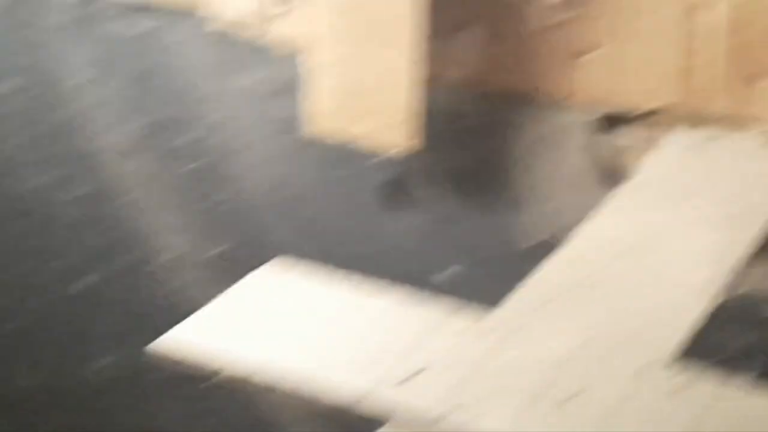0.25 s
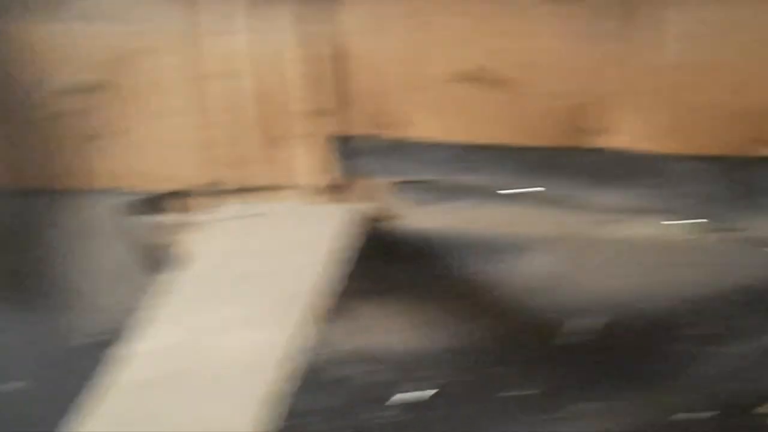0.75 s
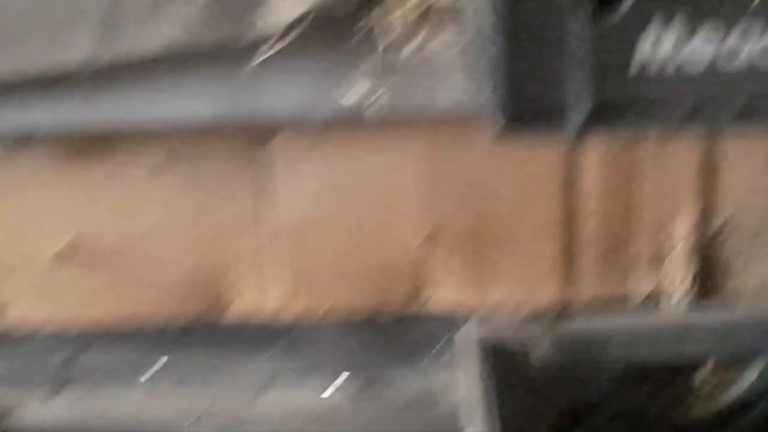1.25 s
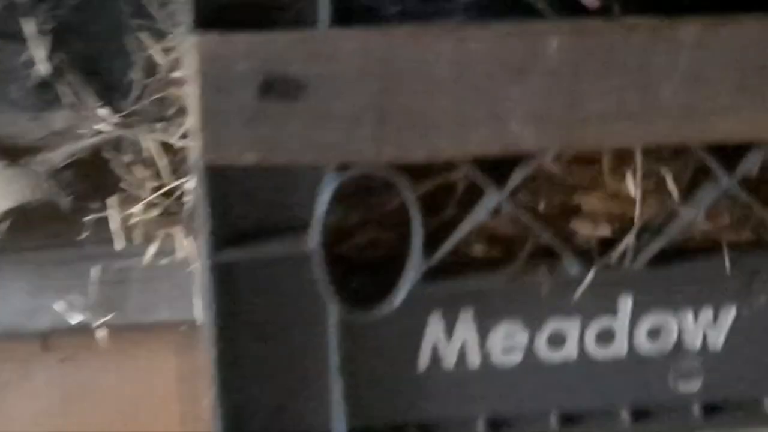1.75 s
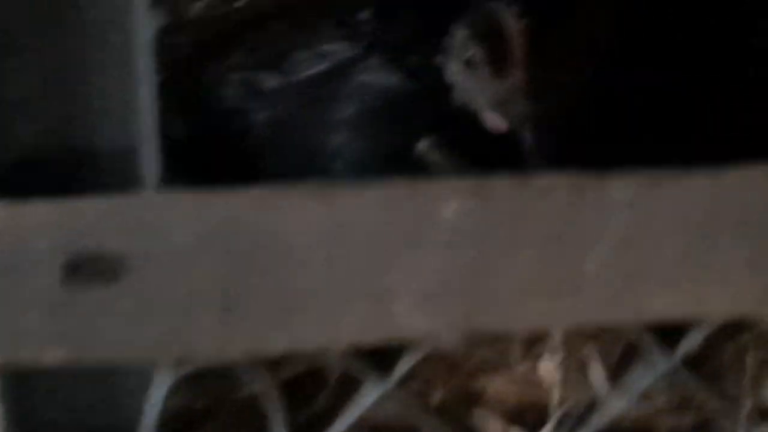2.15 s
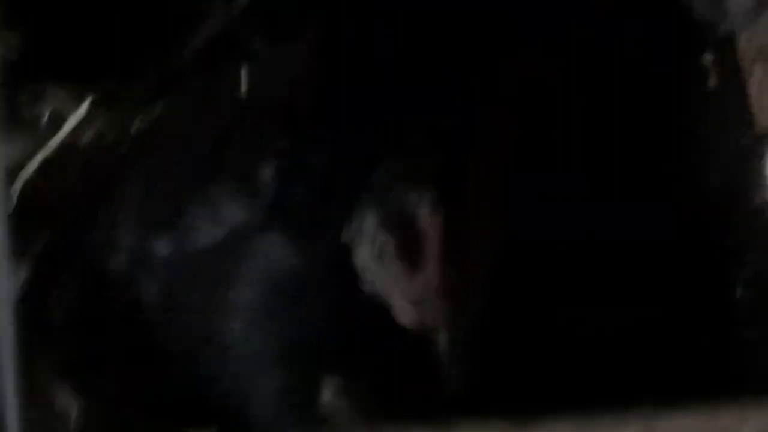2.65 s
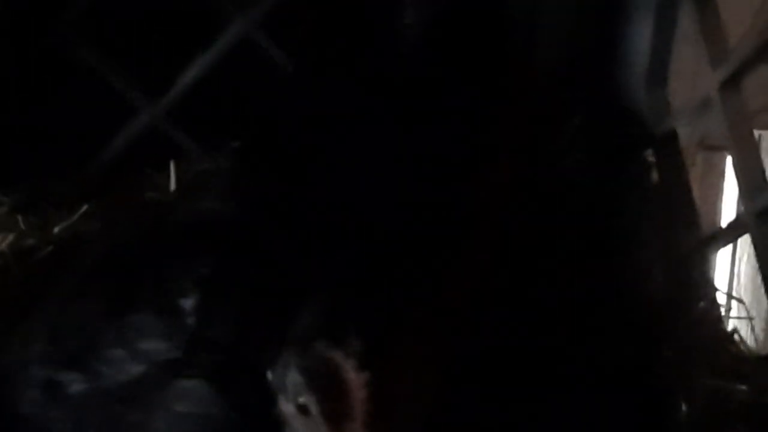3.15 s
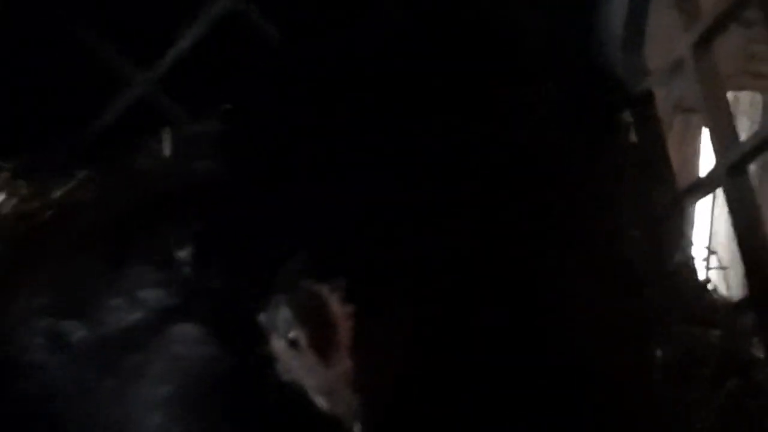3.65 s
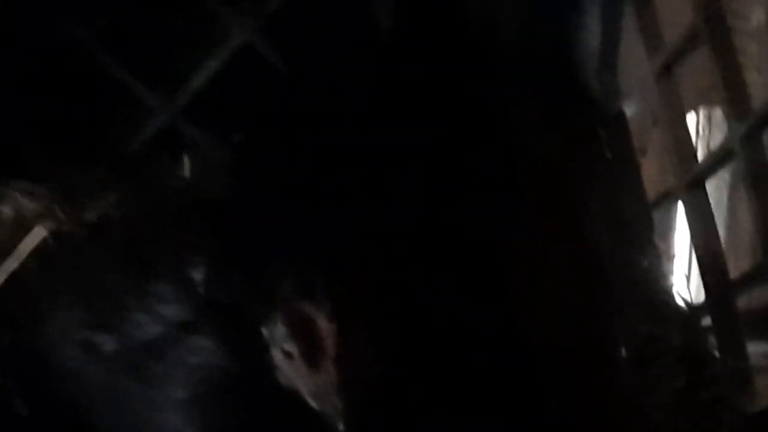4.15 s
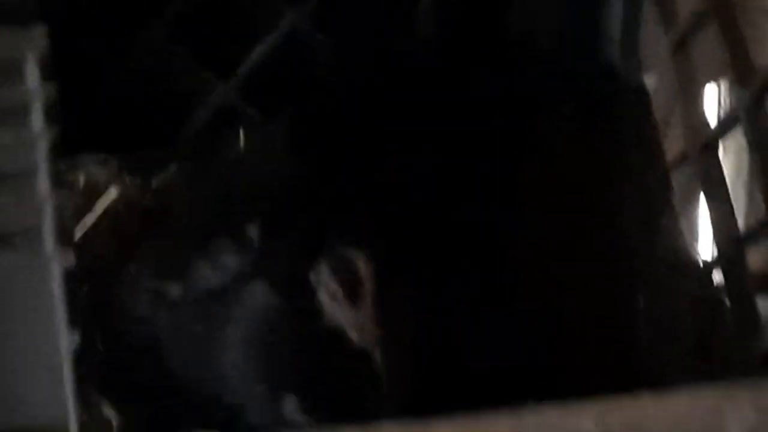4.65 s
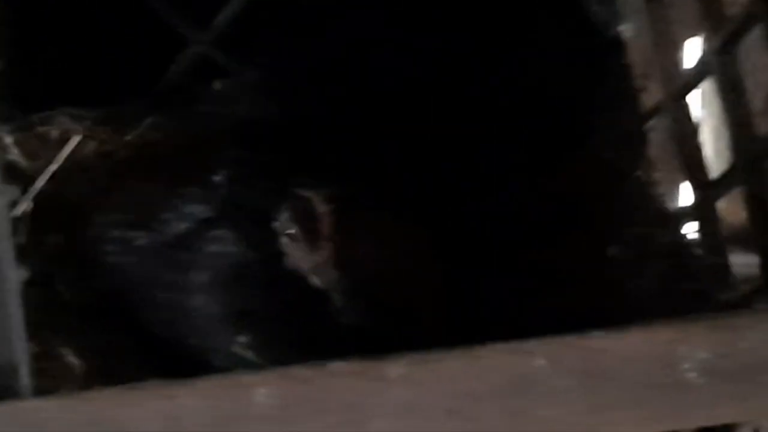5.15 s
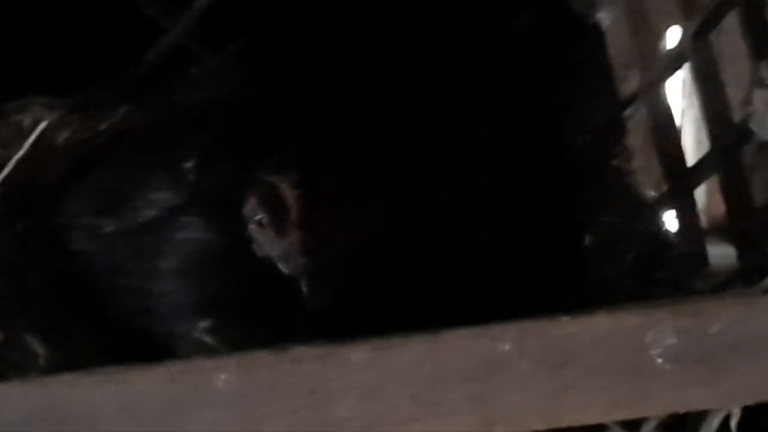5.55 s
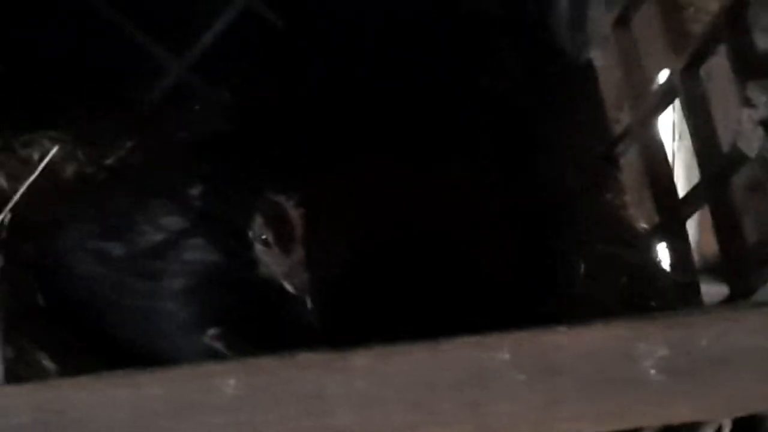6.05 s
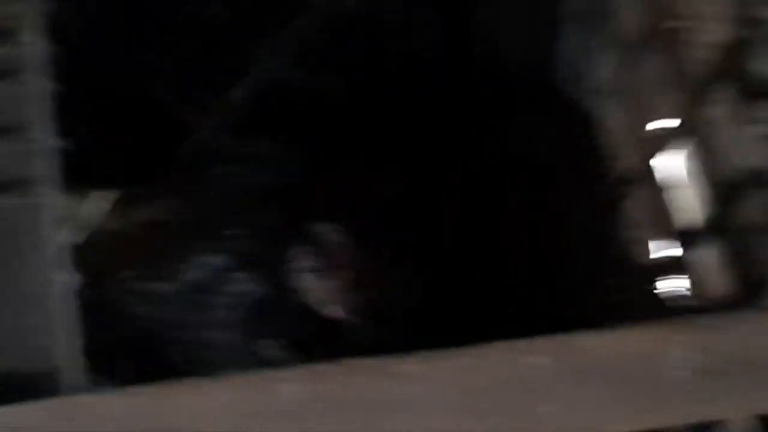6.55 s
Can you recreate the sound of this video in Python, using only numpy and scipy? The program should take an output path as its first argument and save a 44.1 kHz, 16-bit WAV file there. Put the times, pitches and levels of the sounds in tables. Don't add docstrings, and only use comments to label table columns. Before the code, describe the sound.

Handling bumps and a hen's rough squawk, then overlapping rooster crows with close clucks in a wooden coop, ending in clucks, growly moans and sharp handling ticks.

```python
import sys
import numpy as np
from scipy import signal
from scipy.fft import rfft, irfft
from scipy.io import wavfile
from scipy.ndimage import uniform_filter1d

SR = 44100
rng = np.random.default_rng(int(sys.argv[2]) if len(sys.argv) > 2 else 0)


def unload_audio(sound):
    columns = np.transpose(np.atleast_2d(sound))
    steps = np.round(np.clip(columns, -1, 1) * 32767)
    wavfile.write(sys.argv[1], SR, steps.astype(np.int16))


def nominal_scale(level):
    x = np.asarray(level, float) / 20
    return 10 ** x


N = 299880

# [f/Hz, left-right level/dB]
PORT_SHADING = [(60, 2.5), (150, 2), (380, 4.5), (950, 5), (2380, -5), (5980, -7), (15000, 11.5)]


def evened(x):
    return x / np.sqrt(np.mean(x ** 2) + 1e-20)


def read(points, hz):
    f, value = np.transpose(points)
    return np.interp(np.log(hz + 1), np.log(f + 1), value)


def unroll(rows):
    s, *columns = np.transpose(rows)
    t = np.arange(s[0], s[-1], 1 / SR)
    return s[0], [np.interp(t, s, c) for c in columns]


def add(mix, s, sound):
    part = mix[..., round(s * SR):][..., :sound.shape[-1]]
    part += sound[..., :part.shape[-1]]


def wobble(size, hz):
    settle = 4000
    drift = signal.lfilter(*signal.butter(2, hz, fs=SR), rng.standard_normal(size + settle))
    return evened(drift[settle:])


def resonate(x, hz, width, count=1):
    turn = np.exp(2j * np.pi * np.cumsum(hz * np.ones(len(x))) / SR)
    r = np.exp(-np.pi * width / SR)
    low = x / turn
    for _ in range(count):
        low = signal.lfilter([1 - r], [1, -r], low)
    return 2 * (turn * low).real


def swell(t, rise):
    return t / rise * np.exp(1 - t / rise)


def ports(x, lag_ms, wet_db):
    # [f/Hz, t60/s]
    wall_decay = [(200, 0.4), (800, 0.32), (2500, 0.39), (8000, 0.1)]
    taps = np.zeros((2, SR // 2))
    at = np.arange(100, SR // 2 - 20, 20) + rng.integers(0, 20, (2, (SR // 2 - 101) // 20))
    np.put_along_axis(taps, at, rng.choice([-1., 1.], at.shape), 1)
    hz, t, z = signal.stft(taps, SR, nperseg=256)
    decay = nominal_scale(-60 * t / read(wall_decay, hz)[:, None])
    tail = signal.istft(z * decay, SR, nperseg=256)[1]
    tail /= np.linalg.norm(tail[0])
    both = x + nominal_scale(wet_db) * signal.fftconvolve(x[None], tail, axes=1)[:, :N]

    hz = np.fft.rfftfreq(2 * N, 1 / SR)
    side = np.array([[.5], [-.5]])
    shading = nominal_scale(side * read(PORT_SHADING, hz))
    delay = np.exp(-2j * np.pi * hz * side * lag_ms / 1000)
    return irfft(rfft(both, 2 * N) * shading * delay)[:, :N]


def phrase(notes, throat, attack_s, release_s, sag_db, scoop, rough, strain, tires=0):
    edge_db = -19
    crow_start_s = 1.9
    calls = []
    for s, length, from_hz, to_hz, effort_db in notes:
        t = np.linspace(0, length, 40)
        edge = np.clip(np.maximum(1 - t / attack_s, 1 - (length - t) / release_s), 0, 1)
        hz = (from_hz + (to_hz - from_hz) * t / length) * (1 - scoop * edge)
        level_db = effort_db + edge_db * edge - sag_db * t / length
        over_db = read(throat, hz)
        first_db = level_db - 10 * np.log10(1 + nominal_scale(2 * over_db))
        shaky = rough + strain * np.maximum(-40 - level_db, 0) + tires * max(s - crow_start_s, 0)
        calls.append(np.transpose([s + t, hz, first_db, first_db + over_db, shaky]))
    return calls


def syllable(rows, beak_db):
    # [t/s, f/Hz]
    gape = [(.9, 3100), (1.4, 5200), (1.56, 3500), (2.2, 3600), (2.42, 5400), (3.1, 4850), (3.18, 5500),
            (3.47, 5100), (3.56, 4100)]
    upper_partials = [-21, -23, -41.5, -29, -40, -42]
    # [f/Hz, width/Hz, level/dB]
    breath_bands = [(1620, 1380, 0), (2260, 45, -13), (2880, 500, -34.5)]
    s, (hz, first_db, second_db, rough) = unroll(rows)
    size = len(hz)
    glide = uniform_filter1d(abs(np.gradient(np.log(hz))) * SR, 2500)
    rough = np.clip(rough + .05 * np.minimum(glide, 5), 0, 1)
    turns = 2 * np.pi * np.cumsum(hz * (1 + .045 * rough * wobble(size, 70))) / SR
    effort = np.hypot(nominal_scale(first_db), nominal_scale(second_db))
    gape_hz = np.interp(s + np.arange(size) / SR, *np.transpose(gape))

    tone = nominal_scale(first_db) * np.sin(turns) + nominal_scale(second_db) * np.sin(2 * turns)
    for k, db in enumerate(upper_partials, 3):
        lift = .07 + 1 / (1 + ((k * hz - gape_hz) / 220) ** 2)
        partial = np.sin(k * turns + k * k) * (1 + .5 * wobble(size, 60))
        tone += effort * nominal_scale(beak_db + db) * lift * partial
    throb = (1 + 1.2 * rough * wobble(size, 110)) / np.sqrt(1 + 1.44 * rough ** 2)

    breath = rng.standard_normal(size)
    rasp = sum(nominal_scale(db) * evened(resonate(breath, f, w, count=3)) for f, w, db in breath_bands)
    voice = np.sqrt(2) * tone * throb + nominal_scale(second_db) * 0.95 * rough ** 1.5 * rasp
    return s, voice * signal.windows.tukey(size, .05)


def bird(calls, beak_db):
    out = np.zeros(N)
    for rows in calls:
        add(out, *syllable(rows, beak_db))
    return out


def clear_rooster():
    # [t/s, length/s, start f/Hz, end f/Hz, effort level/dB]
    clear_notes = [(.615, 0.11, 833, 850, -61), (1.295, 0.075, 646, 699, -47),
                   (1.338, 0.095, 806, 940, -41.5), (1.425, 0.035, 788, 666, -39.5),
                   (1.56, 0.15, 863, 938, -44.5), (1.67, 0.069, 805, 684, -44), (1.74, 0.06, 788, 756, -44),
                   (1.77, 0.17, 917.4, 919, -37.5), (1.935, 0.13, 964, 945, -40),
                   (2.04, 0.11, 932.3, 909, -35.5), (2.155, 0.073, 759, 678, -49),
                   (2.22, 0.082, 656, 656, -49.5), (2.285, 0.086, 725, 862, -47.5),
                   (2.37, 0.082, 844, 857, -46), (2.425, 0.23, 911, 877, -43.5),
                   (2.65, 0.12, 874, 850, -52), (2.79, 0.19, 836, 811.6, -43),
                   (2.97, 0.23, 807, 797.8, -45.5), (3.17, 0.11, 801, 772, -58),
                   (3.28, 0.11, 742, 708, -55), (3.37, 0.15, 628, 666, -59)]
    # [f/Hz, level/dB]
    clear_throat = [(650, -20), (780, -28), (800, 11), (826, 17), (842, 2), (885, 1), (925, -9)]
    calls = phrase(clear_notes, clear_throat, 0.019, 0.022, 1.5, 0.025, rough=.06, strain=.003)
    return ports(bird(calls, -4.), -.12, -8.)


def overtones():
    # [t/s, length/s, start f/Hz, end f/Hz, width/Hz]
    rings = [(.45, .12, 960, 915, 50), (1.35, .14, 5200, 5350, 600), (1.36, .15, 3250, 3200, 200),
             (1.41, .1, 1210, 1230, 60), (1.3, .2, 640, 620, 120), (1.555, .07, 770, 790, 60),
             (1.6, .2, 650, 700, 120), (1.565, .22, 3480, 3510, 130), (1.76, .27, 3560, 3600, 100),
             (2.0, .2, 3540, 3490, 170), (1.56, .3, 2620, 2680, 140), (1.84, .32, 2690, 2730, 160),
             (1.6, .07, 5700, 5700, 160), (1.6, .15, 6250, 6350, 300), (1.7, .4, 4620, 4560, 200),
             (1.84, .16, 6250, 6280, 150), (1.65, .1, 1200, 1230, 70), (2.1, .15, 1220, 1250, 70),
             (2.18, .14, 2450, 2400, 250), (2.22, .23, 3400, 3380, 200), (2.43, .24, 5420, 5340, 110),
             (2.64, .23, 5340, 5080, 150), (2.64, .36, 3340, 3220, 170), (2.7, .27, 2650, 2750, 500),
             (2.68, .28, 2200, 2320, 300), (2.65, .2, 6200, 5900, 150), (2.8, .17, 5650, 5650, 400),
             (3.1, .2, 3080, 2980, 220), (3.26, .29, 2910, 2870, 120), (3.15, .25, 5480, 5400, 420),
             (3.33, .21, 5380, 5100, 520), (3.25, .29, 5900, 5800, 350), (3.44, .22, 4180, 3900, 260),
             (3.2, .25, 2040, 2010, 90), (1.31, .2, 2400, 2400, 700), (2.46, .14, 2300, 2300, 300),
             (1.6, .5, 7050, 7200, 350), (2.22, .2, 7650, 7600, 300), (4.2, .42, 2230, 2420, 380),
             (5.97, .25, 2200, 2500, 600)]
    # [t/s, length/s, start f/Hz, end f/Hz, width/Hz]
    more_rings = [(.54, .06, 2300, 2290, 60), (.77, .03, 3080, 3080, 60), (1.31, .05, 2230, 2230, 60),
                  (1.7, .45, 2250, 2350, 500), (2.68, .1, 2050, 2250, 120), (2.2, .16, 2800, 2800, 1200),
                  (2.45, .17, 2900, 3000, 1200), (2.66, .3, 2900, 2800, 1100), (3.12, .4, 2600, 2500, 900),
                  (1.57, .6, 3100, 3100, 900)]
    ring_levels = [-57, -71, -70.5, -65, -63.5, -57, -64.5, -60, -58, -65.5, -63.5, -67, -75, -81, -78,
                   -73.5, -67, -64.5, -64, -74, -71.5, -70, -64.5, -66.5, -58.5, -79, -76.5, -72.5, -81.5,
                   -71.5, -70, -83, -78.5, -57, -66.5, -58.5, -83, -84.5, -86, -77, -69, -65, -58, -63,
                   -54.5, -68, -66, -65, -70, -72]
    out = np.zeros(N)
    for (s, length, from_hz, to_hz, width), level_db in zip(rings + more_rings, ring_levels):
        hz = np.linspace(from_hz, to_hz, round(length * SR))
        ring = evened(resonate(rng.standard_normal(len(hz)), hz, width, count=2))
        add(out, s, nominal_scale(level_db) * ring * signal.windows.tukey(len(hz), .3))
    return out


def hoarse_rooster():
    # [t/s, length/s, start f/Hz, end f/Hz, effort level/dB]
    hoarse_notes = [(1.33, 0.17, 937, 896, -47.5), (1.565, 0.19, 966, 902, -45),
                    (1.73, 0.21, 952.4, 914.5, -39), (1.88, 0.14, 950.3, 941.5, -37),
                    (2.04, 0.097, 934, 938, -50), (2.15, 0.13, 915, 907, -50.5),
                    (2.23, 0.17, 904, 947, -46), (2.44, 0.14, 934, 901, -45.5),
                    (2.65, 0.23, 911.6, 946, -43), (2.76, 0.21, 931.5, 935, -38.5),
                    (3.115, 0.249, 911.3, 896.4, -42), (3.3, 0.2, 872, 917, -46),
                    (3.47, 0.15, 834.5, 805, -56.5), (3.6, 0.31, 842, 814, -79.5)]
    # [f/Hz, level/dB]
    hoarse_throat = [(620, -12.5), (850, 6.5), (905, 22.5), (930, 15), (955, 4)]
    calls = phrase(hoarse_notes, hoarse_throat, 0.024, 0.055, 3.06, 0.034,
                   rough=.12, strain=.013, tires=.12)
    return ports(bird(calls, -9.5) + overtones(), -0.11, -5)


def thin_rooster():
    # [t/s, length/s, start f/Hz, end f/Hz, effort level/dB]
    thin_notes = [
        (.78, 0.047, 832, 802, -67.5),
        (.812, 0.054, 778, 780, -68),
        (1.31, 0.029, 870, 840, -48.5),
        (1.39, 0.089, 825, 815, -48.5),
        (1.555, 0.25, 876, 866, -53.5),
        (1.74, 0.26, 899, 881, -48.5),
        (1.98, 0.171, 866, 889, -47.5),
        (2.14, 0.11, 885, 868, -50.5),
        (2.225, 0.25, 855.6, 851.6, -43.5),
        (2.43, 0.18, 863, 782, -47.5),
    ]
    # [f/Hz, level/dB]
    thin_throat = [(780, 26), (900, 28)]
    calls = phrase(thin_notes, thin_throat, 0.014, 0.021, 0.97, 0.02, rough=.06, strain=.003)
    return ports(bird(calls[:2], 20.7) + bird(calls[2:], -3.0), 0.099, -3.0)


def squawk():
    # [t/s, length/s, start f/Hz, end f/Hz, effort level/dB]
    squawk_notes = [
        (.335, 0.099, 588.5, 603, -35),
        (.385, 0.089, 545, 552.5, -34),
        (.452, 0.1027, 436, 465, -39),
    ]
    # [f/Hz, level/dB]
    hen_throat = [(450, -4), (590, -21)]
    calls = phrase(squawk_notes, hen_throat, 0.011, 0.0051, 10.3, 0.014, rough=0.45, strain=0.007)
    return ports(bird(calls, -42.0), 0.35, -17.5)


def clucks():
    # [t/s, peak level/dB, chest f/Hz, chest level under peak/dB, throat f/Hz]
    cluck_rows = [(2.057, -23.5, 431, -25.5, 647.4), (2.35, -19.5, 326, -22, 684),
                  (2.546, -21.5, 445, -25.5, 697.5), (2.783, -20, 394.6, -20, 782.4),
                  (3.179, -48.5, 314.6, -9.5, 754), (3.313, -46.5, 402, -9, 701),
                  (3.783, -59.5, 370, 5, 778), (3.895, -58, 447, 1, 641), (4.045, -55, 403, 3.5, 782),
                  (4.149, -34, 332, -9.5, 660.5), (4.362, -51, 373, -0.5, 739), (4.858, -55, 378, -13, 549),
                  (5.065, -53, 352, -9.5, 532), (5.522, -57, 366, 0, 627), (5.67, -49, 369.6, -4, 711),
                  (5.817, -52, 374, -2.5, 727), (6.196, -36.5, 256.6, -12, 770),
                  (6.23, -40, 429.4, -6.5, 609), (6.361, -35.5, 323, -6.5, 707)]
    open_db, wide_at_db, shut_soft, shut_loud = -7, -33, 1.1, .75
    lead = .62
    out = np.zeros(N)
    t = np.arange(round(.1 * SR)) / SR
    for s, peak_db, chest_hz, chest_db, throat_hz in cluck_rows:
        beak_db = open_db - max(shut_soft * (wide_at_db - peak_db), shut_loud * (peak_db - wide_at_db))
        rise = 0.023 + 0.00042 * max(beak_db + 30.0, 0)
        shape = swell(t, rise) ** 3.5 + .06 * np.tanh(t / rise) ** 3 * np.exp(-t / .035)
        shape *= nominal_scale(1.6 * wobble(len(t), 90))

        mouth = throat_hz * (.88 + 0.16 * np.tanh(t / 0.022))
        turns = np.cumsum(.5 * mouth * (1 + 0.045 * wobble(len(t), 80))) / SR
        pulses = evened(sum(np.cos(2 * np.pi * k * turns) for k in range(1, 14)))
        drive = pulses * (1 + 0.3 * np.cos(np.pi * turns)) + 0.5 * wobble(len(t), 4000)

        def formant(low_hz, low_width, high_hz, high_width):
            return evened(resonate(resonate(drive, low_hz, low_width), high_hz, high_width))

        throat = formant(mouth, 190, mouth, 220)
        upper = formant(870, 440, 1020, 650)
        upper += nominal_scale(-23.5) * formant(2100, 400, 2250, 500)
        upper += nominal_scale(-31) * formant(3200, 500, 3200, 500)
        upper += nominal_scale(-22.0 + 0.91 * min(peak_db + 25.5, 0)) * formant(3800, 420, 3800, 420)
        upper *= np.sqrt(np.roll(shape, 150))

        puff = shape * evened(resonate(rng.standard_normal(len(t)), 220, 300, count=2))
        chest = np.sin(2 * np.pi * chest_hz * t) * np.roll(shape, 300) ** .85
        chest *= 1 + .3 * wobble(len(t), 60)
        voice = shape * (throat + nominal_scale(beak_db + 7.5) * upper)
        cluck = voice + nominal_scale(chest_db + 8.0) * chest + nominal_scale(-24.5) * puff
        add(out, s - lead * rise, nominal_scale(peak_db - 13.5) * cluck)
    return ports(out, 0.32, -17.0)


def growls():
    # [t/s, voice f/Hz, level/dB]
    growl_rows = [
        [(0.99, 384, -67), (1.046, 358, -78), (1.17, 370.5, -79)],
        [(4.38, 379, -86.5), (4.428, 322.4, -67.5), (4.6, 339, -88.5)],
        [(5.38, 326, -75), (5.434, 341.3, -72), (5.6, 341, -77.5)],
        [(6.13, 298.8, -63.5), (6.5, 317.3, -57.5), (6.78, 335, -54), (6.8, 326, -50.5)],
    ]
    out = np.zeros(N)
    for rows in growl_rows:
        s, (hz, level_db) = unroll(rows)
        size = len(hz)
        voice = 2 * np.pi * np.cumsum(hz * (1 + 0.009 * wobble(size, 20))) / SR
        flutter = .287 * voice
        above = .45 * np.sin(voice + flutter) + .3 * np.sin(voice + 2 * flutter)
        above += .09 * np.sin(voice + 4.6 * flutter) * wobble(size, 25)
        below = .24 * np.sin(.78 * voice) + .17 * np.sin(flutter) + .05 * np.sin(2 * flutter)
        tone = evened(np.sin(voice) + above + below) * (1 + 0.25 * wobble(size, 45))
        add(out, s, nominal_scale(level_db) * tone * np.tanh(np.arange(size) / 600))
    return ports(out, 0.032, -6)


def ticks():
    # [t/s, click level/dB, case level under click/dB, click f/Hz, left-right level/dB]
    taps_on_case = [(0.2398, -33, -22, 1710, -5.5), (.2713, -34, -15, 1870, -4),
                    (0.39, -36.5, -24, 2500, 1), (0.454, -43, -15, 2000, -8), (.725, -56, 5.5, 2440, -11),
                    (1.1475, -56, -14.5, 2270, -9), (1.2062, -54.5, -21, 2260, -4),
                    (1.2798, -52, -16, 1330, 15), (1.2923, -44.5, -16, 2300, -17),
                    (1.302, -44, -18, 2210, -8), (5.9118, -55.5, 3, 1800, -5), (5.9333, -19.5, 0, 2020, -5),
                    (5.988, -46, -6.5, 1880, 4), (6.136, -37, 4, 2130, -8), (6.244, -47, -10, 2800, 0),
                    (6.37, -49, -6, 3200, -2.5), (6.4587, -42, 6, 2680, 19), (6.473, -54, 3, 2815, 1)]
    # [f/Hz, level under click/dB, t60/s]
    case_modes = [(1640, 1.5, .012), (2500, -2.5, 0.011), (4250, 0, 0.0044), (5400, -4.5, 0.0031)]
    case_hz, case_rise_s, click_rise_s = 610, .0017, .0005
    out = np.zeros((2, N))
    t = np.arange(1500) / SR
    onset = np.tanh(t / click_rise_s)
    rings = [nominal_scale(db - 60 * t / t60) * np.sin(2 * np.pi * hz * t) * onset for hz, db, t60 in case_modes]
    left_rings = 0.42 * rings[0] + 0.47 * rings[1] + .4 * rings[2] + 1.4 * rings[3]
    right_rings = rings[0] + .4 * rings[1] + rings[2] + .3 * rings[3]
    for s, click_db, case_db, click_hz, pan_db in taps_on_case:
        case = nominal_scale(case_db) * swell(t, case_rise_s) ** 2 * np.sin(2 * np.pi * case_hz * t)
        click = swell(t, click_rise_s) * np.sin(2 * np.pi * click_hz * t)
        left = 1.18 * case + nominal_scale(pan_db / 2) * (click + left_rings)
        right = case + nominal_scale(-pan_db / 2) * (click + right_rings)
        add(out, s, nominal_scale(click_db) * np.array([np.roll(left, 18), right]))
    return out


def snaps():
    # [t/s, peak level/dB, left-right level/dB]
    slips = [
        (0.273, -48.5, -0.5),
        (.3895, -37, -2.5),
        (.3915, -39, 1),
        (.48, -48, 2),
        (1.2914, -62, -2),
        (5.934, -28.5, -13.5),
        (6.245, -50.5, 4),
        (6.37, -34, 0),
        (6.459, -37.5, 6),
    ]
    out = np.zeros((2, N))
    t = np.arange(1500) / SR
    lower_band = signal.butter(2, [5500, 8500], "band", fs=SR)
    upper_band = signal.butter(2, [10500, 15500], "band", fs=SR)
    for s, peak_db, pan_db in slips:
        burst = swell(t, 0.0001) * rng.standard_normal((2, len(t)))
        snap = nominal_scale(-5.0) * signal.lfilter(*lower_band, burst) + signal.lfilter(*upper_band, burst)
        add(out, s, nominal_scale(peak_db + pan_db * np.array([[.5], [-.5]])) * snap)
    return out


def bumps():
    # [t/s, peak level/dB, f/Hz]
    bump_rows = [
        (0.019, -31.5, 69),
        (0.176, -29, 99),
        (0.208, -31, 68),
        (0.322, -26.5, 70),
        (0.58, -47, 66),
        (0.724, -40, 168),
        (5.942, -36.5, 115),
    ]
    out = np.zeros((2, N))
    t = np.arange(4000) / SR
    for s, peak_db, hz in bump_rows:
        push = np.sin(2 * np.pi * hz * np.array([[1.25], [1]]) * t)
        push *= nominal_scale(peak_db - 60 * t / 0.055) * np.tanh(t / 0.0041)
        add(out, s, push * np.array([[.3], [1.6]]))
    return out


def strokes(rows, rest_db):
    t, level_db = np.arange(N) / SR, rest_db
    for s, peak_db, rise, fade in rows:
        level_db = np.maximum(level_db, peak_db - np.maximum(rise * (s - t), fade * (t - s)))
    return level_db


def crackle(level_db):
    size = nominal_scale(3.2 * np.minimum(rng.exponential(1, (2, N)), 4))
    size *= (rng.random(N) < 500 / SR) * rng.choice([-1., 1.], (2, N))
    return nominal_scale(level_db) * evened(signal.lfilter(*signal.butter(1, [1200, 4500], "band", fs=SR), size))


def squeak():
    # [t/s, f/Hz, level/dB]
    finger_slide = [
        (0, 2350, -55),
        (.07, 2400, -56),
        (.13, 2880, -52),
        (.2, 3930, -54.5),
        (.26, 4360, -59),
    ]
    s, (hz, level_db) = unroll(finger_slide)
    friction = rng.standard_normal((2, len(hz)))
    ring = np.array([evened(resonate(z, hz, 760, count=2)) for z in friction])
    out = np.zeros((2, N))
    add(out, s, nominal_scale(level_db) * ring * nominal_scale([[-2.5], [2.5]]))
    return out


def noise(shape, level_db, patchy_db, alike=0.64):
    # [f/Hz, left-right likeness/1]
    likeness = [(60, 0.8), (240, 1), (950, -0.17), (3770, 0.12), (15000, -0.35)]
    hz = np.fft.rfftfreq(512, 1 / SR)
    a, b, c, d, patches = rng.standard_normal((N // 128 + 5, 257, 5)).T
    patches = evened(uniform_filter1d(uniform_filter1d(patches, 6, 0), 10, 1))
    same = np.clip(alike * read(likeness, hz), -1, 1)[:, None]
    left = a + 1j * b
    right = same * left + np.sqrt(1 - same ** 2) * (c + 1j * d)
    side_db = read(PORT_SHADING, hz)[:, None] * np.array([.5, -.5])[:, None, None]
    z = np.array([left, right]) * nominal_scale(read(shape, hz)[:, None] + patchy_db * patches + side_db)
    return nominal_scale(level_db) * evened(signal.istft(z, nperseg=512, noverlap=384)[1][:, :N])


def hand():
    # [t/s, peak level/dB, rise/(dB/s), fade/(dB/s)]
    scrapes = [(.24, -44, 20.5, 54), (.395, -40, 215, 114), (.72, -62.5, 27, 48), (1.15, -64.5, 13, 146),
               (1.33, -60.5, 392, 52), (2.08, -56, 198, 26), (5.97, -49.5, 287, 284.5),
               (6.06, -60.5, 93, 33), (6.245, -49.5, 317, 284), (6.37, -50.5, 179, 282),
               (6.47, -61, 100, 219)]
    # [t/s, peak level/dB, rise/(dB/s), fade/(dB/s)]
    slides = [(.19, -53.5, 20, 82), (.44, -59, 17, 51), (.8, -62.5, 170, 11.8), (1.2, -63, 30, 110),
              (1.4, -77, 35, 14), (2.08, -68, 190, 15), (2.82, -72.5, 100, 10.1), (5.95, -70, 320, 98),
              (6.24, -60.5, 1700, 400), (6.36, -66, 93, 200), (6.42, -79, 13, 14), (6.72, -74.5, 1100, 99)]
    # [t/s, peak level/dB, rise/(dB/s), fade/(dB/s)]
    pushes = [
        (0, -39, 100, 200),
        (.19, -21.5, 530, 88),
        (.32, -59, 200, 44),
        (.44, -49.5, 46, 110),
        (.74, -54.5, 420, 300),
        (1.46, -70, 28, 39),
        (2.08, -53.5, 250, 370),
        (5.93, -54, 340, 77),
        (6.58, -62.5, 59, 4.3),
    ]
    # [f/Hz, level/dB per Hz]
    rustle_shape = [(150, -33.5), (250, -20), (325, 6.5), (362, -7.5), (416, -33.5), (456, -7),
                    (1150, -10.5), (2650, -12), (10000, -37), (13000, -43.5), (22000, -120)]
    # [f/Hz, level/dB per Hz]
    skin_shape = [(4120, -5), (7000, -13.5), (9360, -20), (10800, -4.5), (12200, 0.5), (15100, -2),
                  (16000, -19)]
    rumble_shape = [(20, -19.5), (60, -0.5), (110, 1.5), (200, -7.0), (400, -58.5), (16000, -99)]
    hiss_db, rumble_db = strokes(slides, -88), strokes(pushes, -81.5)
    rustle_db = strokes(scrapes, hiss_db - 5.5)
    grain_db = 2.5 * wobble(N, 150)

    rustle = noise(rustle_shape, rustle_db + grain_db, 2.3)
    hiss = noise([(20, -68.5), (2500, -22.0)] + skin_shape, hiss_db + 3.5 + 0.3 * grain_db, 2.4)
    hiss *= nominal_scale(np.array([[-2.5], [2.5]]))
    rumble = noise(rumble_shape, np.minimum(rumble_db + 0.5, -52), 2.8, 0.2)
    rumble *= nominal_scale(np.clip(-.6 * (rumble_db + 70.5), -16, 3) * np.array([[.5], [-.3]]))
    return rustle + crackle(rustle_db - 26.5) + squeak() + rumble + hiss


def far_hens():
    shape = [(150, -40), (250, -10), (340, 0), (450, -5), (700, -14), (1100, -40), (16000, -99)]
    return noise(shape, -73 + 1.5 * wobble(N, 4), 3.)


def shed():
    # [f/Hz, level/dB per Hz]
    shed_shape = [(15, -33), (35, -22), (84, 7.5), (161, -6.5), (217, -14), (344, -10.5), (545, -6.5),
                  (818, -13.5), (1740, -19), (2610, -18), (7510, -34.5), (9320, -32), (11000, -28.5),
                  (14000, -31.5), (16000, -37.5)]
    return noise(shed_shape, -70, 2.3)


def scene():
    roosters = clear_rooster() + hoarse_rooster() + thin_rooster()
    hens = squawk() + clucks() + growls()
    handling = ticks() + snaps() + bumps() + hand()
    return roosters + nominal_scale(3.5) * hens + handling + far_hens() + shed()


def top_cut(x):
    return signal.sosfilt(signal.butter(12, 16510, fs=SR, output="sos"), x)


def record(dry):
    heard = signal.sosfilt(signal.butter(4, 44, "high", fs=SR, output="sos"), dry)
    return top_cut(heard)


dry = scene()
out = record(dry)
unload_audio(out)
```